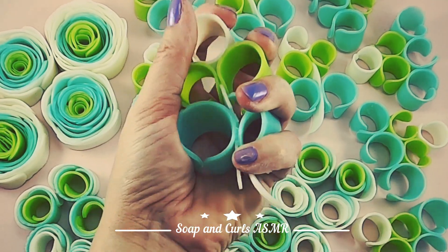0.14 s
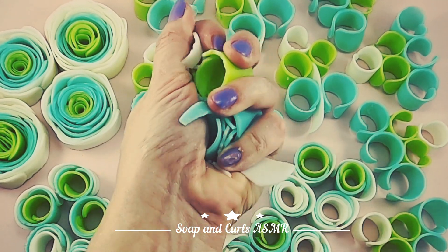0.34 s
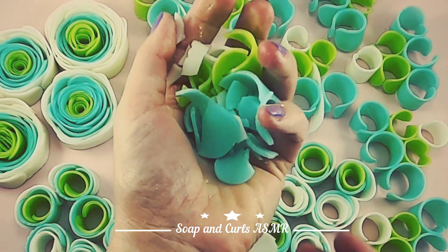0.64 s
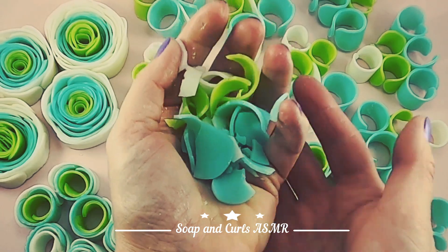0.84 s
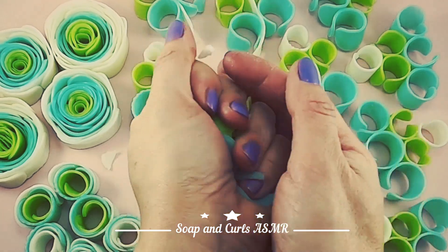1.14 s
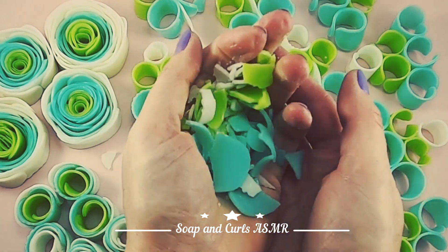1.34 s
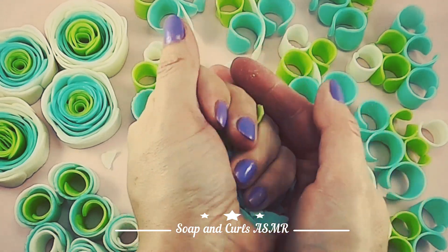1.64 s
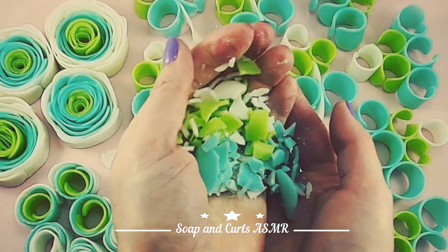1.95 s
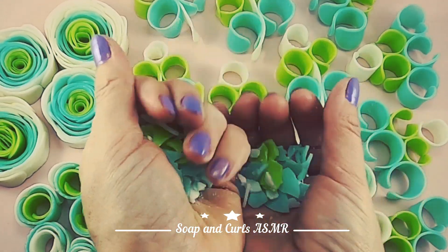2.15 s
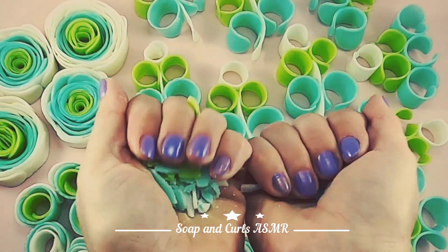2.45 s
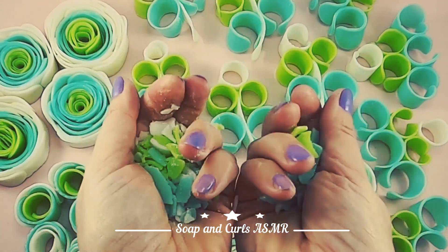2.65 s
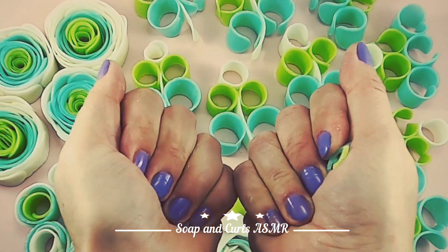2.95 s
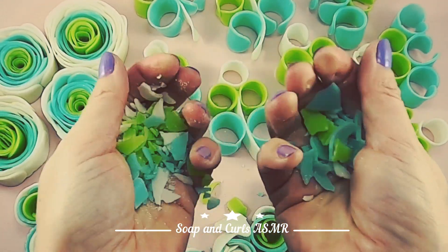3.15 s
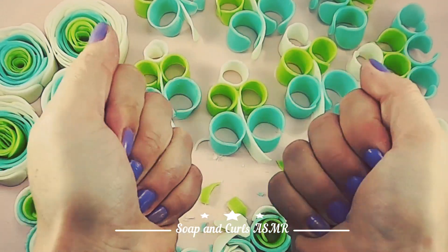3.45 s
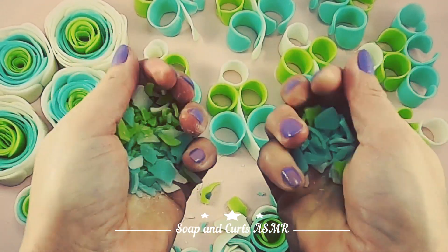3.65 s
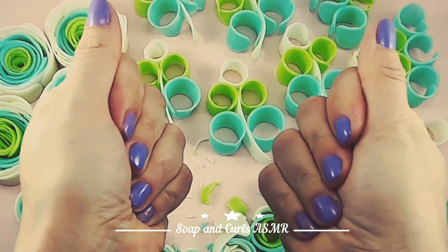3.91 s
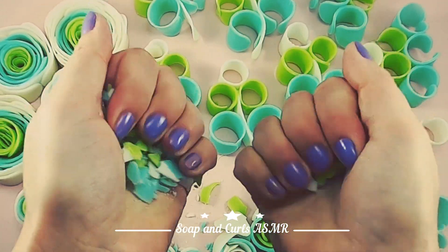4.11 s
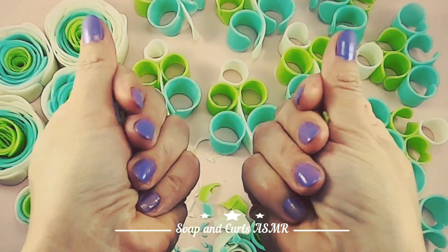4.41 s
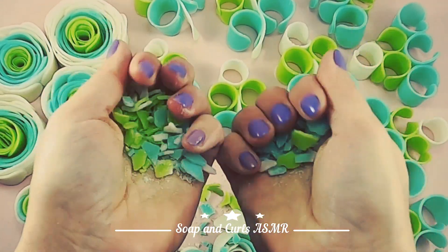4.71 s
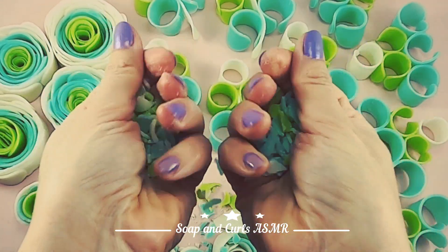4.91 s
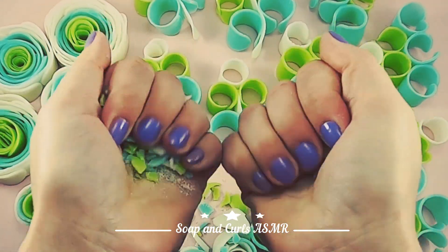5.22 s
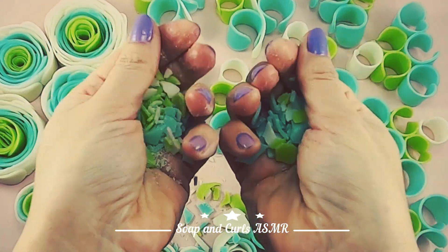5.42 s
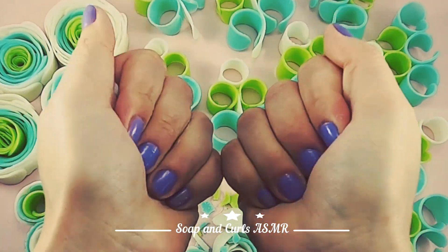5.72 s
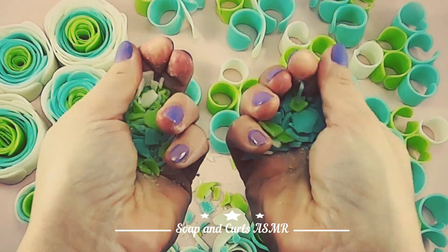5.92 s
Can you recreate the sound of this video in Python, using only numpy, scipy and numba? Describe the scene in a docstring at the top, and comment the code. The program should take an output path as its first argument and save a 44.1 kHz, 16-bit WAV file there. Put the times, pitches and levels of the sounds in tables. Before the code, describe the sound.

Brittle soap shavings are crushed in repeated fist squeezes, crisp snaps turning to muffled pops and gritty crumbling, with bits dropping on a tabletop.

```python
"""Crushing dry soap curls

Two hands crush dry soap curls over a table, close to a small stereo microphone in a quiet room.
Curls snap in the open as trains of tiny breaks, and pieces drop and knock on the ringing table top.
Breaks inside the fist pop in its hollow, whose pitch sinks as the fingers close.
Crumbs crackle and rub, loudest in the squeezes and softer between them, over a low murmur and faint hiss.
"""
import sys
import numpy as np
from scipy import signal
from scipy.fft import rfft, irfft, next_fast_len
from scipy.io import wavfile
from scipy.ndimage import uniform_filter1d
from numba import njit

SR = 44100
rng = np.random.default_rng(int(sys.argv[2]) if len(sys.argv) > 2 else 0)


def dump(signal):
    """Clip the signal to [-1, 1] and save it as 16-bit WAV at the path in sys.argv[1]."""
    limited = np.clip(np.atleast_2d(signal).T, -1, 1)
    pcm = np.round(limited * 32767).astype(np.int16)
    wavfile.write(sys.argv[1], SR, pcm)


N = 267598
TIME = np.arange(N) / SR
HIT = np.arange(SR // 5) / SR  # time since a blow, s
ATTACK = SR // 200  # samples (5 ms) over which the strength of a blow is counted
FFT_SIZE = next_fast_len(N)


def undb(db):
    """Turn decibels into a gain."""
    return 10 ** (np.asarray(db) / 20)


def colour(x, points, size=1024):
    """Filter with a given outline of (f/Hz, level/dB), without sounding ahead of its input."""
    hz, db = np.transpose(points)
    bins = np.maximum(np.fft.rfftfreq(size, 1 / SR), 1)
    outline = undb(np.interp(np.log(bins), np.log(hz), db))
    # folding the cepstrum gives minimum phase
    cepstrum = irfft(np.log(outline))
    cepstrum[1:size // 2] *= 2
    cepstrum[size // 2 + 1:] = 0
    response = irfft(np.exp(rfft(cepstrum)))
    return signal.oaconvolve(np.atleast_2d(x), response[None], axes=-1)[:, :x.shape[-1]]


def level(x, db=0):
    """Scale a steady sound to an rms level."""
    return x * undb(db) / np.sqrt(np.mean(x ** 2))


def blow(x, db, count=1):
    """Scale a blow by the energy of its first moments."""
    head = np.atleast_2d(x)[:, :(count + 1) * ATTACK]
    return x * undb(db) / np.sqrt(np.mean(head ** 2) * (count + 1))


def ring(hz, t60, t):
    """One damped tone; t60 is the time in s it takes to fall by 60 dB."""
    return np.sin(2 * np.pi * hz * t) * np.exp(-np.log(1000) * t / t60)


def add(out, s, x, pan_db=0):
    """Mix a blow into both channels at its time; a positive pan leans left."""
    start = max(int(s * SR), 0)
    balance = undb(np.array([[pan_db], [-pan_db]]) / 2)
    x = (x * balance)[:, :N - start]
    out[:, start:start + x.shape[1]] += x


def ports(x, apart):
    """Turn two unrelated rows into a part both ears share and a part that differs between them."""
    return x[0] + apart * x[1] * np.array([[1], [-1]])


@njit
def bandpass(x, hz, q):
    """A resonance whose pitch and sharpness may move."""
    y, band, low = np.empty(len(x)), 0., 0.
    for i in range(len(x)):
        g = np.tan(np.pi * hz[i] / SR)
        v = (band + g * (x[i] - low)) / (1 + g * (g + 1 / q[i]))
        band, low, y[i] = 2 * v - band, low + 2 * g * v, v / q[i]
    return y


# colour of the quiet room: f/Hz, level/dB
FLOOR = [(25, -5.5), (60, -11.5), (110, -11.5), (180, 3.5), (260, -4.5), (450, 0.5), (700, -17),
         (1500, -8.5), (4000, -22), (8000, -26), (16000, -26)]


def floor():
    """Low murmur of the room and faint hiss: steady noise, strongest in the lows."""
    noise = ports(rng.standard_normal((2, N)), apart=0.9)
    return level(colour(noise, FLOOR, size=4096), db=-69.5)


# colour of the room's reflections: f/Hz, level/dB
ROOM = [(60, -4.5), (200, 7), (500, 1.5), (1200, 1.5), (3500, -2.5), (8000, -4.5), (16000, 0)]


def room(x, t60=0.31, early_db=-3, early_s=0.0028):
    """Quick reflections off hands and table, then the short tail of a furnished room, as fading noise."""
    t = np.arange(SR // 2) / SR
    tail = np.exp(-np.log(1000) * t / t60)
    early = undb(early_db) * np.exp(-t / early_s)
    shape = (tail + early) * (t > .003)  # nothing comes back in the first 3 ms
    noise = rng.standard_normal((2, len(t)))
    # the part that differs between the ears has its own colour
    noise[1] = colour(noise[1], [(100, -4), (400, -8.5), (1500, -4.5), (4000, 3.0), (16000, -5.0)])[0]
    response = colour(ports(noise, apart=0.73) * shape, ROOM)
    response /= np.sqrt(np.sum(response ** 2) / 2)
    return signal.fftconvolve(x, response, axes=-1)[:, :N]


# low jolts that reach the microphone through its stand: t/s, starting level/dB, decay/s
JOLTS = [(0.353, -51, 0.012), (0.454, -67, 0.084), (0.836, -39, 0.059), (1.018, -48.5, 0.048),
         (4.531, -44, 0.038)]
# colour of a jolt: f/Hz, level/dB
JOLT_COLOUR = [(25, -17.5), (75, 0.5), (130, -1.5), (250, 4.5), (500, -17), (2000, -49), (16000, -70)]


def jolts():
    """Low, dull shudders: bursts of deep noise that die away."""
    out = np.zeros((2, N))
    for s, db, decay in JOLTS:
        burst = ports(rng.standard_normal((2, len(HIT))), apart=0.37) * np.exp(-HIT / decay)
        shudder = colour(burst, JOLT_COLOUR, size=4096)
        # turns the average level into the level at the start
        add(out, s, level(shudder, db) * np.sqrt(decay / HIT[-1] / 2))
    return out


# squeezes of the fist (crackle levels are relative: hands() and grind() scale them further):
# fingers bite t/s, pressing ends t/s, tightest t/s, pitch of the hollow when tightest f/Hz,
# crackle in the open level/dB, crackle through the hollow level/dB, release/s,
# gain of the top treble at the fingers level/dB
SQUEEZES = [(.29, .5, .54, 2130, -51.5, -32.5, 0.028, 3.5), (1.11, 1.33, 1.35, 1480, -43, -33, 0.023, -8),
            (1.83, 1.92, 1.908, 1434, -38.5, -32, 0.02, -3),
            (2.41, 2.46, 2.49, 1066, -45, -38.5, 0.072, -2.5),
            (2.95, 3.06, 3.08, 1174, -43, -36.5, 0.023, -12), (3.45, 3.56, 3.64, 1266, -39, -37, 0.068, -7),
            (3.99, 4.1, 4.15, 1072, -53, -44.5, .11, -5), (4.5, 4.78, 4.71, 1115, -47, -46, 0.084, 5.5),
            (5.15, 5.28, 5.3, 1100, -42, -42.5, 0.048, -9.5), (5.7, 5.83, 5.82, 1175, -49.5, -44.5, .07, 1)]
# pitch of the hollow in the open hand, Hz; time the fingers take to close and to open, s
OPEN_HZ, CLOSE_S, OPEN_S = 3655, 0.16, 0.17
BITE_S = 0.016  # rise of the crackle before the bite is full


def fist(t):
    """How far the fingers are shut (0-1) and the pitch of their hollow, which sinks as they close."""
    shut, octaves = 0, 0
    for _, _, tight_s, tight_hz, *_ in SQUEEZES:
        away = np.maximum((tight_s - t) / CLOSE_S, (t - tight_s) / OPEN_S)
        closed = np.exp(-away ** (5 / 2))
        shut = shut + closed
        octaves = octaves + closed * np.log2(tight_hz / OPEN_HZ)
    return np.minimum(shut, 1), OPEN_HZ * 2 ** octaves


def pressing(t):
    """Strength of the crackle in the open and in the hollow: each squeeze bites, holds and lets go."""
    bright, muffled = 0, 0
    for bite_s, end_s, _, _, open_db, hollow_db, release_s, _ in SQUEEZES:
        effort = np.exp(np.minimum(t - bite_s, 0) / BITE_S - np.maximum(t - end_s, 0) / release_s)
        bright = bright + undb(open_db) * effort
        muffled = muffled + undb(hollow_db) * effort
    return bright, muffled


# loose flakes shifting as the fingers relax and regrip (levels relative, as for the squeezes):
# middle t/s, half length/s, in the open level/dB, through the hollow level/dB
RUSTLES = [(0.091, 0.024, -88, -39.5), (0.189, 0.032, -60, -66), (0.661, 0.025, -48, -52),
           (0.75, 0.085, -53, -56.5), (0.933, 0.048, -58, -49.5), (1.016, 0.023, -53, -45),
           (1.446, 0.019, -56, -50.5), (1.527, 0.044, -47.5, -60), (1.779, 0.064, -56, -39.5),
           (2.112, 0.081, -54, -56), (2.306, 0.13, -52, -52), (2.674, 0.052, -59.5, -46),
           (2.861, 0.18, -60.5, -42), (3.226, 0.069, -52, -41), (3.762, 0.031, -68, -49.5),
           (3.811, 0.045, -53, -59), (4.315, 0.045, -57, -32), (4.873, 0.04, -54.5, -42),
           (5.06, 0.1, -73, -72), (5.425, 0.052, -55, -43.5), (5.503, 0.031, -55, -70),
           (5.98, 0.073, -59.5, -37)]
STILL_DB = -62.5  # crumbs settling in a resting hand, on the same relative scale


def shifting(t):
    """Strength of the rustle in the open and in the hollow: soft swells over a faint settling."""
    bright, muffled = undb(STILL_DB) * (t > SQUEEZES[0][0]), 0
    for s, half_s, open_db, hollow_db in RUSTLES:
        swell = np.exp(-((t - s) / half_s) ** 2)
        bright = bright + undb(open_db) * swell
        muffled = muffled + undb(hollow_db) * swell
    return bright, muffled


def hands(size=32):
    """Crackle in the open and in the hollow, and its pitch: shutting the fist shifts the sound inside."""
    t = TIME[::size]  # movements are worked out every few samples
    shut, hz = fist(t)
    bright, muffled = np.hypot(pressing(t), shifting(t))
    bright = bright * undb(-1.5 * shut)  # dB lost in the open when the fist is shut
    muffled = muffled * undb(-21.5 * (1 - shut))  # dB lost in the hollow when the hand is open
    return [np.interp(TIME, t, curve) for curve in (bright, muffled, hz)]


def grains(rate, scatter_db, rub, flutter_db):
    """Tiny breaks (rate per s) of very uneven size, in flurries together with the rub of flake on flake."""
    sizes = undb(scatter_db * np.minimum(rng.exponential(size=N), 4))
    breaks = level((rng.random(N) < rate / SR) * sizes)
    smooth = uniform_filter1d(rng.standard_normal(N), SR // 200)
    flurry = level(uniform_filter1d(smooth, SR // 300))
    crackle = breaks * rng.choice([-1, 1], (2, N)) + rub * rng.standard_normal((2, N))
    return crackle * undb(flutter_db * flurry)


# colour of breaking crumbs: f/Hz, level/dB
CRUMB = [(100, -32.5), (700, -26), (1500, -18), (2300, -10.5), (3100, -4.5), (4000, -3), (5500, -5),
         (7500, -8), (9000, -7), (10500, -17.5), (13000, -18), (16000, -30)]


def grind(open_db=-2.5, hollow_db=-2, gap_db=-8):
    """Crumbs crackle in the open and through the hollow that the fingers close and open."""
    bright, muffled, hz = hands()
    outside = grains(rate=390, scatter_db=7, rub=0.94, flutter_db=2.5)
    outside = colour(ports(outside, apart=.5), CRUMB)
    inside = ports(grains(rate=1200, scatter_db=3, rub=0.75, flutter_db=4), apart=0.26)
    # as the hand opens, its resonance climbs into the crackle and grows leaky and broad
    opening = np.clip((hz - 2000) / 1200, 0, 1)
    q = 3.2 - 1.8 * opening
    broad = np.full(N, .7)
    inside = np.array([bandpass(bandpass(c, hz, q), hz, broad) for c in inside])
    inside = level(inside * np.sqrt(q / hz))
    through = undb(hollow_db) * muffled + opening * undb(gap_db) * bright
    # now and then a single crumb ticks clear of the rest
    ticks = colour(ports(grains(rate=70, scatter_db=4, rub=0, flutter_db=0), apart=.4), CRUMB)
    outside = level(outside) + level(ticks, db=-11)
    return level(outside, open_db) * bright + inside * through


def fracture(ms, scatter_db, after_db, after_s, apart):
    """A crack runs as a quick train of uneven micro-breaks; splinters chatter after it."""
    run = np.exp(-HIT * 1000 / ms)
    splinters = undb(after_db) * np.exp(-HIT / after_s)
    opening = 1 - np.exp(-HIT / .0005)
    sizes = undb(scatter_db * np.clip(rng.standard_normal(len(HIT)), -2.5, 2.5))
    noise = ports(rng.standard_normal((2, len(HIT))), apart)
    return noise * sizes * (run + splinters) * opening


def flake(x, depth):
    """Every fragment has its own short ring, which favours one pitch in the crack."""
    hz, q = np.full(len(HIT), rng.uniform(2800, 4870)), np.full(len(HIT), 6.)
    return x + depth * np.array([bandpass(c, hz, q) for c in x])


# ringing tones of the table top, varied a little at each blow:
# f/Hz, level/dB (relative), time to fall 60 dB/s (thump() uses at most 0.25)
TABLE_MODES = [(218.6, -18.5, 0.23), (349, -1, 0.28), (409.3, -5, 0.3), (523.2, -3.5, 0.21),
               (603, -9, 0.069), (729, -13.5, 0.52)]
# colour of the dead thud: f/Hz, level/dB
THUD = [(40, -27.5), (120, -32), (190, -7.5), (270, -2.5), (350, 3.5), (430, -3.5), (600, -6.5),
        (850, -9.5), (1500, -42.5), (16000, -85.5)]


def thump(db, thud_db=-8, dead_s=0.0097, detune=0.0288):
    """The table top gives a dead thud; its few modes ring on briefly, a little differently each time."""
    push = ring(370 * rng.uniform(.85, 1.2), .026, HIT)
    thud = colour(rng.standard_normal(len(HIT)) * np.exp(-HIT / dead_s), THUD)
    modes = 0
    for k, (hz, mode_db, t60) in enumerate(TABLE_MODES):
        louder, higher = rng.standard_normal(2)
        tone = ring(hz * (1 + detune * higher), min(t60, .25), HIT)
        modes = modes + undb(mode_db + 2 * louder) * tone * (-1) ** k
    board = blow(push, 0) + blow(thud, thud_db) + blow(modes, db=-7.5)
    # only heavy pieces push long enough to raise the lowest modes
    lightness = np.clip((-24 - db) / 10, 0, 1)
    bass = [(40, -26.5), (120, -10 - 9 * lightness), (160, -14 - 9 * lightness),
            (205, -9 * lightness), (300, 0.5), (16000, -1)]
    return blow(colour(board, bass, size=2048), db)


# pieces landing on the table:
# t/s, tick level/dB, clack level/dB, length of the clatter/ms, thump level/dB
DROPS = [(.837, -34, -36.5, 2.6, -19.5), (0.8834, -46, -40.5, 3.4, -33), (0.9633, -59, -46.5, 0.66, -37),
         (1.017, -22.5, -29, 2.8, -22.5), (1.1032, -18, -20, 2.7, -26), (1.1785, -32, -32, 2.9, -32),
         (1.5404, -31, -39, 2.8, -34.5), (2.8699, -38, -47, 13, -45.5), (2.974, -25.5, -29.5, 4.7, -31),
         (3.447, -28.5, -37, 0.87, -34.5), (3.4865, -24.5, -35, 1.7, -33.5), (3.505, -23.5, -31, 4.6, -35),
         (3.5149, -23, -25.5, 8.7, -40), (3.5277, -29, -56, 11, -29), (3.559, -28, -31, 4.2, -36),
         (4.0134, -31.5, -40.5, 1.2, -36), (4.022, -31, -41, 1.6, -47.5), (4.4842, -47, -57, 6, -42.5),
         (4.518, -31, -47, 21, -34), (4.542, -29.5, -34.5, 10, -33.5), (4.553, -31, -36.5, 0.86, -30),
         (4.579, -33, -37, 16, -36), (4.6961, -37.5, -37, 2, -36.5), (4.7385, -31, -29.5, 1.6, -36.5),
         (4.8248, -41.5, -38.5, 1.8, -42.5), (4.99, -37, -45, 3.5, -40.5), (5.1465, -22, -25, 1.6, -29),
         (5.2017, -26.5, -24.5, 2.9, -29.5), (5.216, -22.5, -30.5, 7, -46), (5.2373, -22, -28.5, 3.1, -29),
         (5.2634, -32, -33, 0.61, -35.5), (5.3743, -43, -44, 1.2, -47), (5.604, -46.5, -76, 4.7, -54.5),
         (5.696, -33, -39, 1.9, -39.5), (5.7499, -35, -52, 2.8, -43.5), (5.7882, -23, -29.5, 7.6, -31.5),
         (5.8977, -43.5, -39.5, 2.6, -44.5)]
# colour of a bright crack, also used for the snaps: f/Hz, level/dB
CRACK = [(100, -55), (700, -34), (1500, -23.5), (2300, -26.5), (3100, 4), (4100, 4), (5500, 1), (7500, -5),
         (10000, -9.5), (13000, -20), (16000, -36)]
# colour of a clack on the table: f/Hz, level/dB
CLACK = [(60, -38), (200, -13.5), (600, 2.5), (1000, 3.5), (1700, 2), (2400, 3.5), (3300, -2.5),
         (5000, -29.5), (16000, -28.5)]


def drops():
    """A piece ticks, clacks and thumps on the table top: two trains of micro-breaks and a ringing board."""
    out = np.zeros((2, N))
    for s, tick_db, clack_db, ms, thump_db in DROPS:
        tick = fracture(ms, scatter_db=9, after_db=-24.5, after_s=0.0033, apart=0.48)
        clack = fracture(ms, scatter_db=4, after_db=-12.5, after_s=0.039, apart=.25)
        add(out, s, blow(flake(colour(tick, CRACK), depth=1.0), tick_db))
        add(out, s, blow(colour(clack, CLACK), clack_db))
        add(out, s, thump(thump_db))
    return out


def small_pops(count=2, below_db=-6.5):
    """Lesser breaks at chance moments late in each squeeze, as rows like those of POPS."""
    rows = []
    for bite_s, end_s, _, _, _, hollow_db, *_ in SQUEEZES:
        for early in rng.random(count):
            rows.append((end_s - (end_s - bite_s) * early / 2, hollow_db + below_db))
    return rows


# breaks shut inside the fist: t/s, level/dB
POPS = [(.4941, -28.5), (.5225, -35), (1.2394, -19), (1.2678, -27), (1.2824, -36), (1.3023, -23.5),
        (1.3106, -27), (1.3216, -22.5), (1.3466, -32), (1.814, -31), (1.8343, -19.5), (1.8554, -24),
        (1.8614, -24.5), (1.8797, -28), (1.918, -23.5), (1.9327, -27), (2.4077, -32), (2.4399, -28.5),
        (2.4506, -30), (2.4561, -20.5), (3.019, -26.5), (3.04, -26.5), (3.0528, -21), (3.0769, -38.5),
        (3.6229, -28.5), (3.6542, -37), (4.0881, -28.5), (4.1454, -26), (4.1755, -28.5), (4.306, -42.5),
        (4.6815, -27), (4.7716, -31.5), (5.2998, -38)]


def pops(t60=0.0082, upper=1.32, upper_db=-6, leak_db=-14, pan_db=-2.0):
    """A break inside the fist rings the air between the fingers; a little of the crack leaks out."""
    out = np.zeros((2, N))
    t = HIT[:6 * ATTACK]
    for s, db in list(POPS) + small_pops():
        # a pop sounds slightly above the hollow's pitch, by an uneven amount
        hz = fist(s)[1] * 1.023 * (1 + 0.014 * rng.standard_normal())
        # a tighter fist is lower and lets less treble through
        looseness = (hz / 1500) ** 2
        air = ring(hz, t60, t) + looseness * undb(upper_db) * ring(hz * upper, t60 / 2, t)
        air = colour(air, [(100, -38.0), (600, -12), (1200, 1.5), (3500, 4.5), (7000, -15.5), (16000, -24.5)])
        # small breaks crowd before and after the main one
        cluster = rng.standard_normal(len(t)) * np.exp(-abs(t - t[ATTACK]) / .003)
        cluster *= undb(-10) / np.linalg.norm(cluster)
        cluster[ATTACK] += 1
        add(out, s - t[ATTACK], blow(signal.fftconvolve(air, cluster[None]), db, count=2), pan_db)
        crack = fracture(1.5, scatter_db=9, after_db=-27.5, after_s=.008, apart=0.88)
        add(out, s, blow(colour(crack, CRUMB), db + leak_db) * looseness)
    return out


def strain(db, lead=0.0052):
    """Fine cracks gather for a few milliseconds before a piece gives way."""
    t = HIT[:2 * ATTACK]
    creak = level(colour(ports(rng.standard_normal((2, len(t))), apart=.4), CRACK))
    return undb(db) * creak * np.exp((t - t[-1]) / lead)


def small_snaps():
    """One flake breaks somewhere in each rustle, as rows like those of SNAPS."""
    chance = rng.uniform(-1, 1, len(RUSTLES))
    # crack and body are set from the open level of the rustle; each break runs 2.5 ms
    return [(s + half_s * when, db + 1.5, db - 12, 2.5)
            for (s, half_s, db, _), when in zip(RUSTLES, chance)]


# curls breaking in the open: t/s, crack level/dB, flake body level/dB, length of the fracture/ms
SNAPS = [(0.1852, -44.5, -52, 0.63), (.2276, -44, -46, 2.8), (.292, -27.5, -38, 1.2),
         (0.3261, -36, -37.5, 0.35), (.3528, -19.5, -46, 5.5), (.3545, -27.5, -25.5, 3.2),
         (0.3604, -24, -24.5, 3.2), (0.3722, -32, -32, 0.42), (.3844, -28.5, -50, 9.2),
         (.433, -22, -25.5, 2.2), (0.4486, -23.5, -27, 6.3), (0.4733, -30, -26.5, 3.3),
         (0.482, -30, -31, 9.6), (.4934, -25, -75, 1.1), (.5224, -29, -34, 1.9), (0.649, -38, -63, 3.7),
         (.6711, -41, -54, 1.6), (0.9745, -31, -43.5, 7.3), (0.9985, -30.5, -37.5, 0.82),
         (1.2168, -33.5, -34, 1.5), (1.2254, -29.5, -33.5, 2), (1.261, -34, -33, 1.8),
         (1.281, -28.5, -32.5, 1.4), (1.363, -39, -46, 2.4), (2.28, -41.5, -70.5, 3.5),
         (2.6054, -42.5, -66.5, 0.98), (2.9093, -27, -32, 3.8), (3.0276, -19, -28, 2),
         (3.2181, -29, -37.5, 0.53), (3.954, -43.5, -63, 4.1), (3.9825, -27.5, -38.5, 6.3),
         (4.07, -39, -56, 1.4), (4.201, -48, -47.5, 2), (4.4788, -34, -52, 4.4), (4.665, -31, -45, 2.6),
         (5.2457, -31, -31.5, 1), (5.6698, -38.5, -59, 3.2), (5.969, -34, -37.5, 2.2)]
# colour of the lower body of a flake: f/Hz, level/dB
FLAKE_BODY = [(60, -26), (250, -21), (700, -18.5), (1200, -15.5), (1700, -6), (2300, 0.5), (3200, -5),
              (5000, -33.5), (16000, -69)]


def snaps(strain_db=-17):
    """Brittle breaks: a faint creak, then a bright crack and the lower body of the curl."""
    out = np.zeros((2, N))
    breaks = list(SNAPS) + small_snaps()
    for (s, crack_db, body_db, ms), pan_db in zip(breaks, rng.standard_normal(len(breaks))):
        crack = fracture(ms, scatter_db=4, after_db=-22.5, after_s=0.0044, apart=0.42)
        body = fracture(ms, scatter_db=5, after_db=-10, after_s=0.0079, apart=0.32)
        add(out, s - 2 * ATTACK / SR, strain(crack_db + strain_db), pan_db)
        add(out, s, blow(flake(colour(crack, CRACK), depth=0.44), crack_db), pan_db)
        add(out, s, blow(colour(body, FLAKE_BODY), body_db))
    return out


def fingers(x, edge_hz=7500):
    """The fingers shade or uncover the shortest waves, gliding from one squeeze to the next."""
    sheen_db = np.interp(TIME, [row[0] for row in SQUEEZES], [row[-1] for row in SQUEEZES])
    hz = np.fft.rfftfreq(FFT_SIZE, 1 / SR)
    highpass = hz ** 6 / (hz ** 6 + edge_hz ** 6.)
    top = irfft(rfft(x, FFT_SIZE) * highpass, FFT_SIZE)[:, :N]
    return x + top * (undb(sheen_db) - 1)


def scene(lag=1.193):
    """All sources sit slightly right of centre, so the left port hears them a little later (lag in samples)."""
    cracks, landings, hollow_pops, crumbs = snaps(), drops(), pops(), grind()
    direct = cracks + landings + hollow_pops + crumbs + jolts()
    wet = room(undb(-11) * cracks + undb(-9) * landings + undb(-16) * hollow_pops + undb(-25.5) * crumbs)
    left, right = fingers(direct + wet)
    delay = np.exp(-2j * np.pi * np.fft.rfftfreq(FFT_SIZE) * lag)
    left = irfft(rfft(left, FFT_SIZE) * delay, FFT_SIZE)[:N]
    return np.array([left, right]) + floor()


def record(dry):
    """The left port is a little duller than the right; the recorder cuts the top above 15.9 kHz."""
    left = colour(dry[0], [(100, 0), (4000, 0), (8000, -2), (13000, -3.5)])[0]
    right = colour(dry[1], [(100, 0), (4000, 0), (8000, 1), (13000, 1)])[0]
    lowpass = signal.ellip(8, .2, 70, 15900, fs=SR, output="sos")
    return signal.sosfilt(lowpass, [left, right])


dry = scene()
out = record(dry)
dump(out)
```